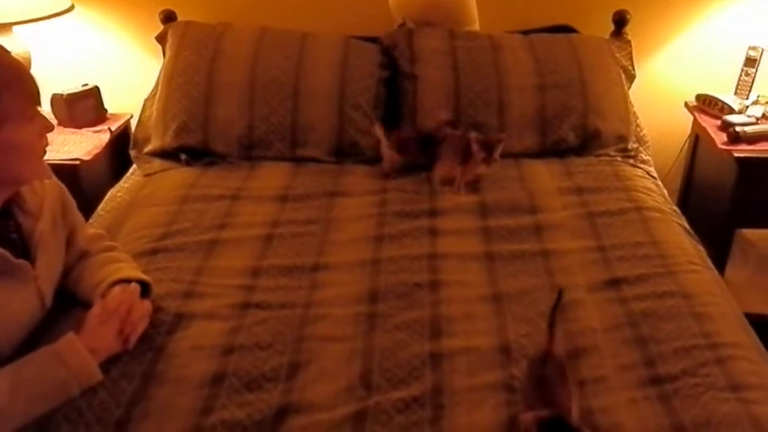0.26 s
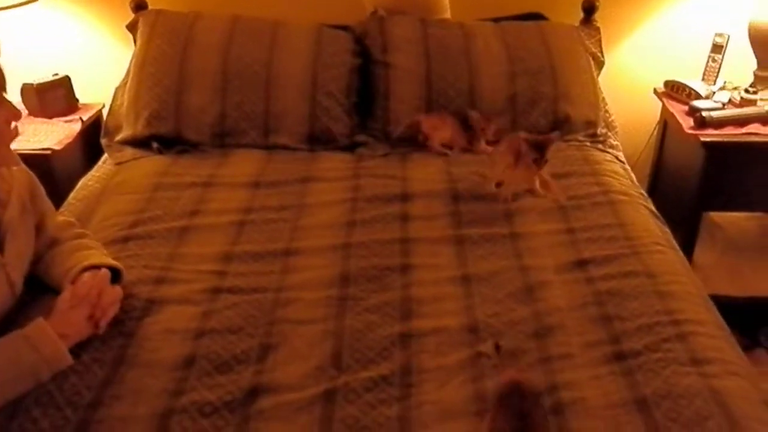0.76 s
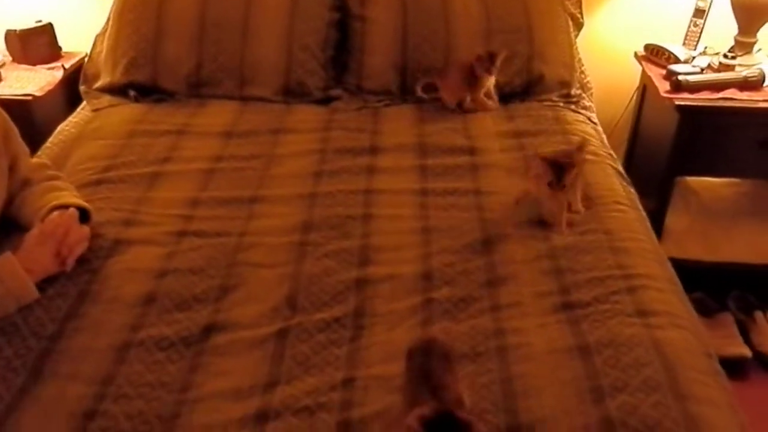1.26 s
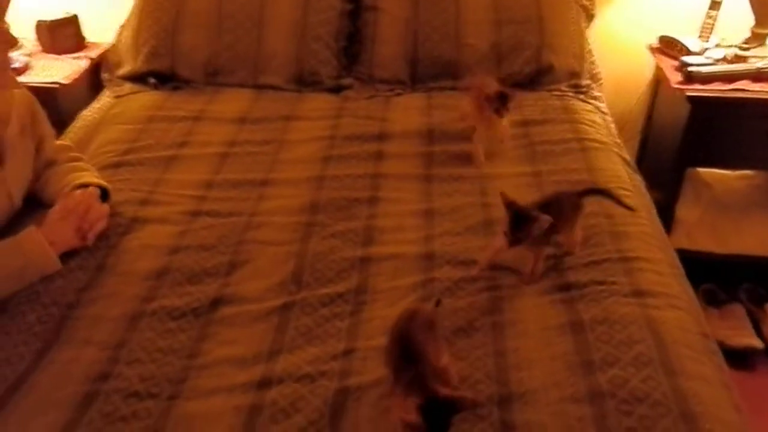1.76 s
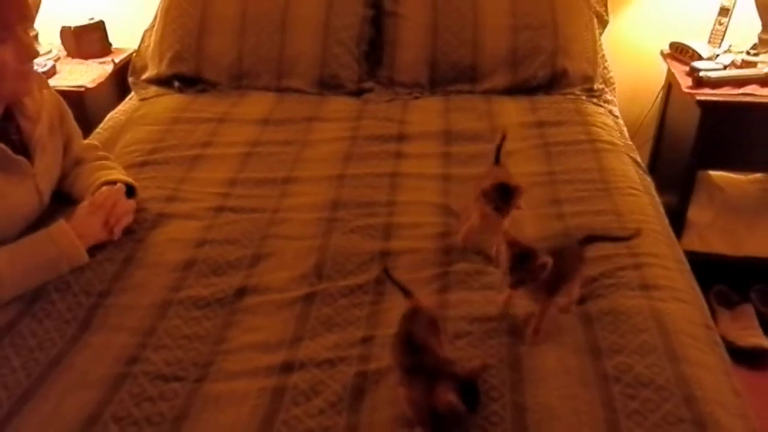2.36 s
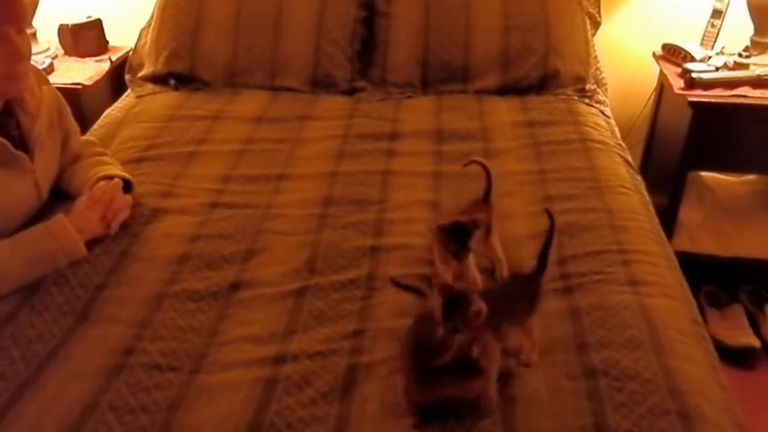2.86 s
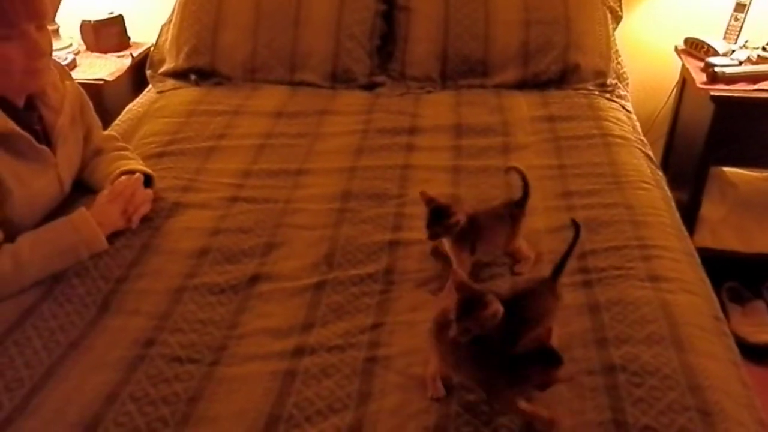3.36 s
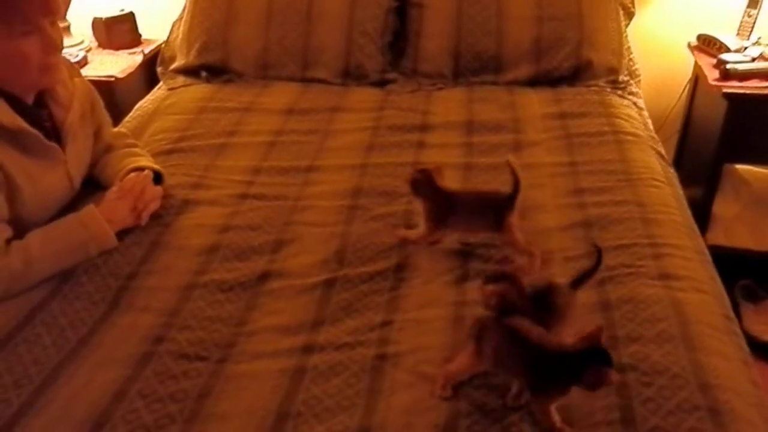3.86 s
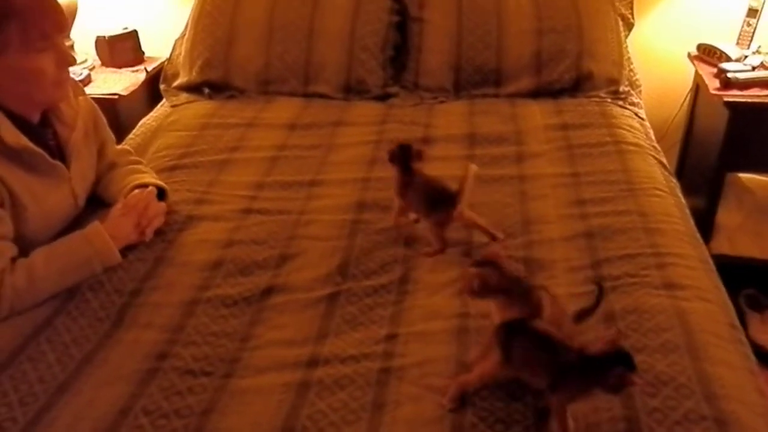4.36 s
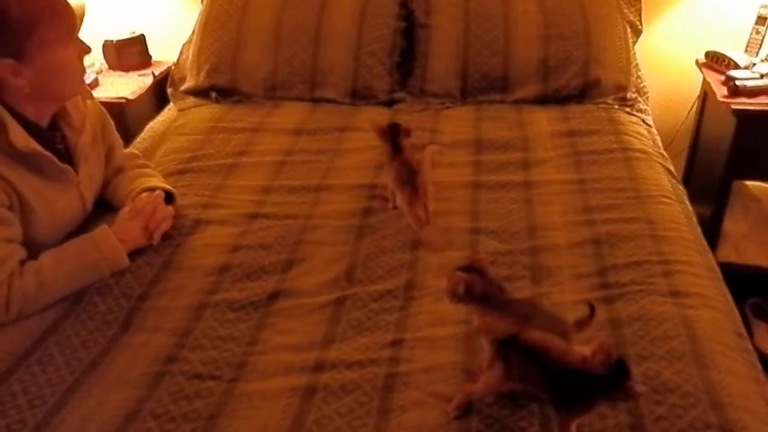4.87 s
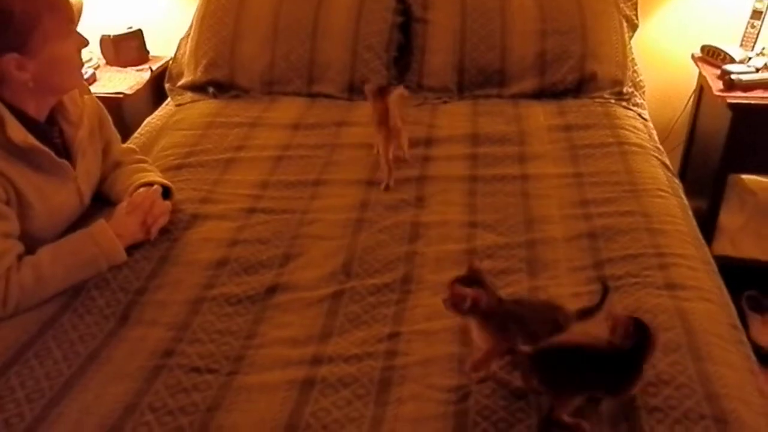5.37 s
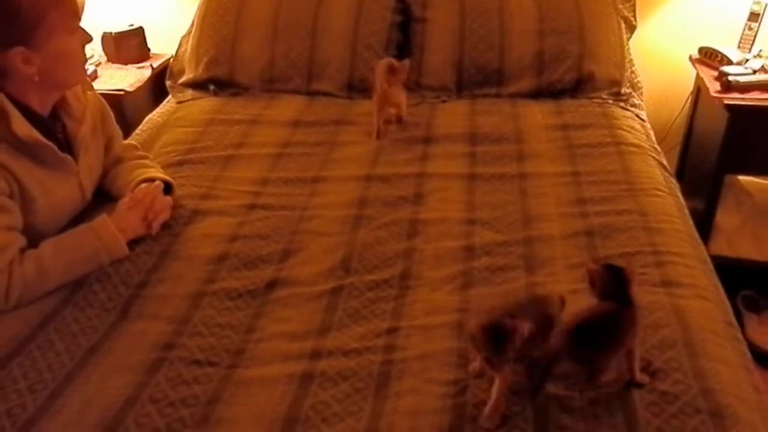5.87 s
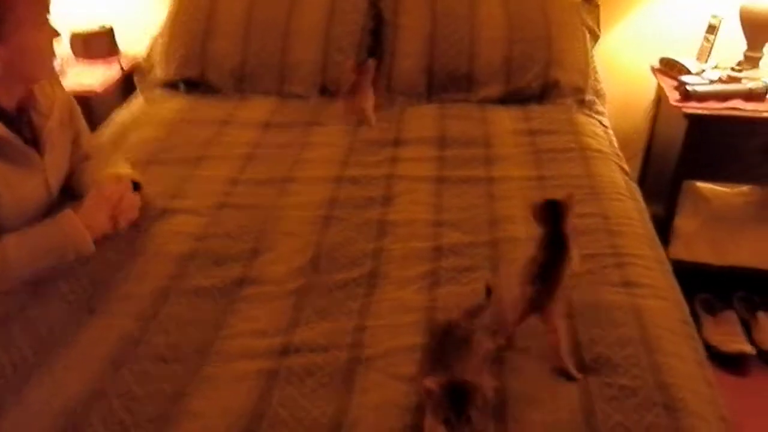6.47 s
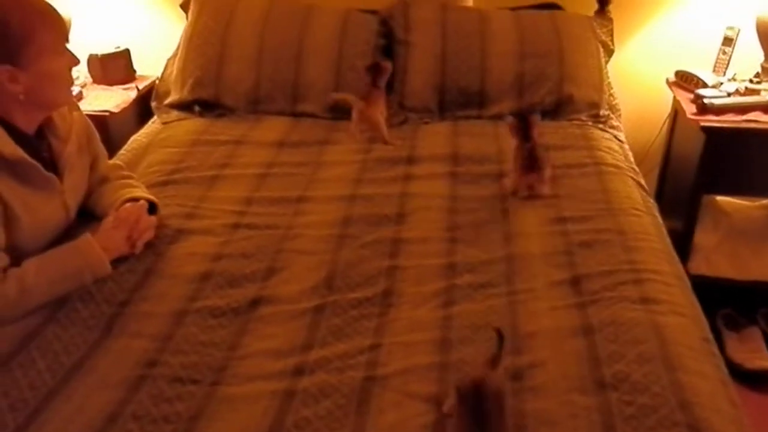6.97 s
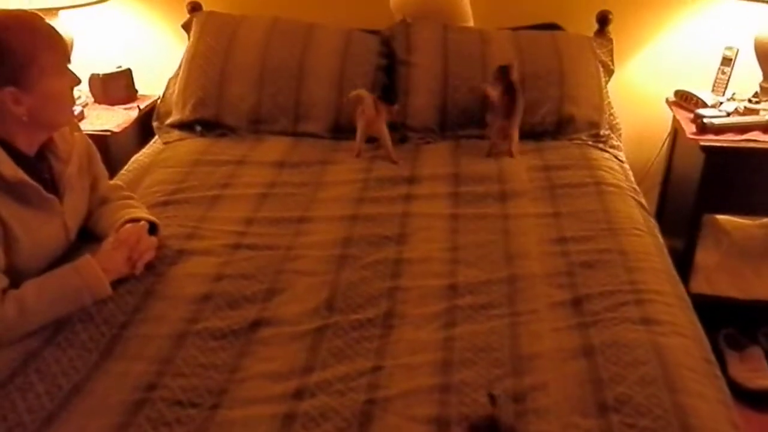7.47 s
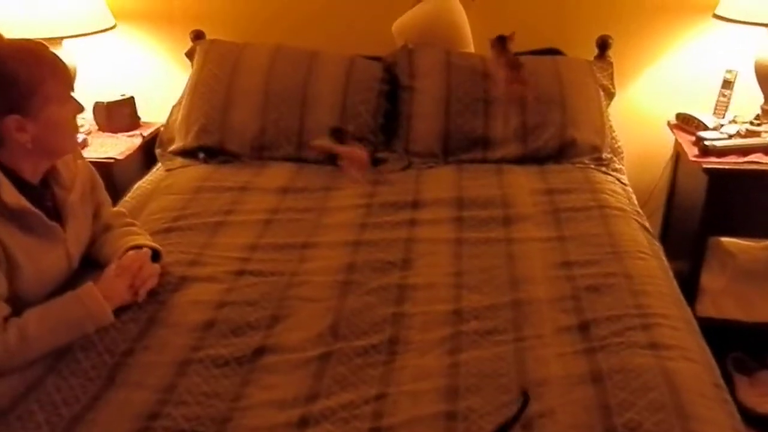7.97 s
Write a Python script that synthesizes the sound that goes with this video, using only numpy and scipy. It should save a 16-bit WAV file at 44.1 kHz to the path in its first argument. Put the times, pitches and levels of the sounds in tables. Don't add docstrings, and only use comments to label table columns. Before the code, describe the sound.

Small claws scrape woven bedding in irregular bursts, snapping threads and thumping the mattress softly, while a fan and low mains hum continue.

```python
import sys
import numpy as np
from scipy import signal
from scipy.fft import rfft, irfft, next_fast_len
from scipy.io import wavfile
from scipy.ndimage import uniform_filter1d, map_coordinates

SR = 44100
rng = np.random.default_rng(int(sys.argv[2]) if len(sys.argv) > 2 else 0)


def nominal_scale(level):
    x = np.asarray(level, float) / 20
    return 10 ** x


def dump(signal):
    limited = np.clip(np.atleast_2d(signal).T, -1, 1)
    pcm = np.round(limited * 32767).astype(np.int16)
    wavfile.write(sys.argv[1], SR, pcm)


N = 362502


def unit(x):
    return x / np.sqrt(np.mean(x ** 2) + 1e-20)


def along(points, hz):
    f, v = np.transpose(points)
    return np.interp(np.log(hz + 1), np.log(f + 1), v)


def wobble(rate_hz):
    knots = rng.standard_normal(int(N * rate_hz / SR) + 4)
    return map_coordinates(knots, [np.arange(N) * rate_hz / SR])


def filtered(x, response):
    m = next_fast_len(len(x) + 8192)
    return irfft(rfft(x, m) * response(np.fft.rfftfreq(m, 1 / SR)), m)[:len(x)]


def resonance(f, hz, width_hz):
    return 1j * f * width_hz / (hz * hz - f * f + 1j * f * width_hz)


def ringing(x, modes):
    def response(f):
        return sum((-1) ** k * nominal_scale(db) * resonance(f, hz, width_hz)
                   for k, (hz, width_hz, db) in enumerate(modes))
    return filtered(x, response)


def cupped(x, modes):
    def response(f):
        return sum(nominal_scale(db) * hz * width_hz / (hz * hz - f * f + 1j * f * width_hz)
                   for hz, width_hz, db in modes)
    return filtered(x, response)


def tinted(spectrum):
    return lambda x: filtered(x, lambda hz: nominal_scale(along(spectrum, hz)))


def coloured(spectrum):
    return unit(tinted(spectrum)(rng.standard_normal(N)))


def fibres(response, grain_db):
    slips = rng.standard_normal(N) * nominal_scale(grain_db * wobble(300))
    return unit(response(slips))


def claws():
    # (frequency [Hz], level [dB per Hz])
    weave_spectrum = [(700, -20.5), (1050, -9), (1400, -4), (1800, 1.5), (2250, -6.5), (2550, -18),
                      (3000, -13.5), (3600, -21.5), (4400, -34), (6000, -73)]
    # (frequency [Hz], level [dB per Hz])
    nap_spectrum = [(3300, -40), (3900, -10.5), (4500, -14), (5600, -3), (7000, -0.5), (8700, -2.5),
                    (9800, -11.5), (11000, -12), (14000, -11), (16000, -31.5)]
    # (frequency [Hz], level [dB per Hz])
    tear_spectrum = [(2100, -27.5), (2750, 9), (3400, -4), (3900, 3.5), (4800, -2.5), (6500, -11),
                     (10000, -11), (14000, -9.5)]
    # (frequency [Hz], width [Hz], level over the direct path [dB])
    shell_modes = [(2645, 760, -0.5), (4170, 320, -1.5), (4740, 350, 1), (5740, 1200, -2.5),
                   (7030, 300, 2.5), (8310, 960, -1.5)]
    # (frequency [Hz], width [Hz], level [dB])
    cloth_modes = [(370, 190, -1.5), (595.4, 109, -1), (802, 280, -6.5)]

    scrape, nap, body = np.sqrt(strokes())
    stitching = nominal_scale(2.58 * wobble(40))
    treble = scrape * fibres(tinted(weave_spectrum), grain_db=2.5)
    treble += nap * fibres(tinted(nap_spectrum), grain_db=2.0)
    treble += nominal_scale(30.5) * scrape ** 1.812 * fibres(tinted(tear_spectrum), grain_db=3)

    bounce_s = 0.00107
    treble = filtered(treble, lambda f: 1 + 0.092 * np.exp(-2j * np.pi * f * bounce_s))

    def shell(f):
        return 1 + sum(nominal_scale(db) * resonance(f, hz, width_hz) for hz, width_hz, db in shell_modes)

    treble = nominal_scale(-3) * filtered(treble, shell)
    cover = fibres(lambda x: ringing(ringing(x, cloth_modes), cloth_modes), grain_db=3.5)
    return stitching * treble + body * nominal_scale(2.2 * wobble(25)) * cover


def strokes():
    # (time [s], length [s], scrape [dB], weight on the cover [dB])
    swipes = [(0.418, 0.15, -70, 7), (0.769, 0.1, -60, 7), (0.972, 0.045, -72.5, 12.5),
              (1.209, 0.058, -89, 20.5), (1.478, 0.063, -65, 6), (1.644, 0.074, -83, 20),
              (1.71, 0.12, -77, 4), (3.107, 0.17, -75.5, 5), (4.396, 0.14, -68.5, 0),
              (5.953, 0.048, -47, -4), (6.004, 0.11, -76, 4), (6.05, 0.16, -69, -3), (6.23, 0.15, -63, -1),
              (6.496, 0.033, -48.5, -0.5), (6.519, 0.14, -58, 1), (6.782, 0.068, -57.5, 3),
              (6.969, 0.03, -59.5, 9), (6.916, 0.082, -52.5, -3.5), (6.987, 0.15, -62.5, 3.5),
              (7.398, 0.04, -68, 14), (7.45, 0.1, -73, 19), (7.854, 0.17, -82, 25.5)]
    # (time [s], length [s], scrape [dB], weight on the cover [dB])
    drags = [(0.662, 0.049, -72.5, 1), (1.289, 0.087, -62, 2.5), (1.827, 0.2, -62.5, -2),
             (1.963, 0.16, -64.5, -3), (2.037, 0.18, -61, 0), (2.225, 0.11, -59.5, -12),
             (2.331, 0.14, -58, 3.5), (2.668, 0.15, -68.5, 6.5), (2.848, 0.08, -67.5, 8),
             (2.901, 0.087, -68, -5), (3.612, 0.13, -73.5, 13), (3.985, 0.089, -78, 7.5),
             (4.123, 0.23, -63, -3), (4.299, 0.13, -68.5, 5.5), (4.663, 0.069, -71, 1),
             (5.016, 0.098, -86.5, 6), (5.36, 0.17, -80, 0), (6.465, 0.068, -56, 4),
             (6.839, 0.095, -57, 8.5), (7.317, 0.1, -75.5, 10), (7.58, 0.3, -82, 18), (7.69, 0.16, -79, 20),
             (7.99, 0.074, -69, 6), (6.621, 0.044, -49.5, 3), (6.74, 0.17, -62, 0),
             (6.69, 0.071, -48.5, -1)]
    # (time [s], length [s], scrape [dB], weight on the cover [dB])
    pulls = [
        (0.07, 0.36, -76, 5.5),
        (2.495, 0.19, -64.5, 5.5),
        (3.273, 0.083, -76.5, -1),
        (3.707, 0.073, -75, -6.5),
        (3.786, 0.23, -67.5, -12.5),
        (4.803, 0.11, -66.5, -4),
        (5.87, 0.146, -64, -19),
        (6.359, 0.12, -67.5, -18),
        (6.647, 0.053, -63, 10),
    ]
    # (time [s], length [s], scrape [dB], weight on the cover [dB])
    scuffs = [
        (3.044, 0.076, -83, 20),
        (5.216, 0.029, -59, 9.5),
        (5.305, 0.04, -71, 8.5),
        (7.104, 0.2, -62, 2),
        (8.06, 0.11, -81.5, 19.5),
    ]

    rows = [(row, 0.011, 0) for row in swipes]  # (stroke, rise [s], nap level [dB])
    for table, share, nap_db in (drags, 0.31, 0), (pulls, 0.62, 0), (scuffs, 0.15, -20):
        rows += [(row, share * row[1], nap_db) for row in table]

    t = np.arange(N) / SR
    power = np.zeros((3, N))
    for (s, length_s, db, weight_db), rise_s, nap_db in rows:
        end_s = s + length_s
        span = slice(round(s * SR), round(end_s * SR))
        pressure = np.minimum((t[span] - s) / rise_s, (end_s - t[span]) / (length_s - rise_s))
        grip = 1.5 + max(0, 0.17 * (db + 56.5))
        swell = np.clip(grip * pressure, 0, 1) ** 2.2
        nap_db = nap_db - 11.5 - 0.04 * (db + 61.5)
        power[:, span] += swell * nominal_scale(db + np.array([[0], [nap_db], [weight_db]])) ** 2
    return power


def snaps():
    # (time [s], peak [dB], thud [dB], brightness [dB], rattle [0-1])
    thread_snaps = [(0.4223, -40, -1, -11.5, 1), (0.7703, -25, -2.5, -7, 0.16),
                    (0.9700, -28.5, -29.5, -3, 0.6), (0.9789, -34, 4, -20.5, 0.44),
                    (1.2867, -25.5, -5.5, -5.5, 0.29), (1.48, -26, -2, -20.5, 0.44),
                    (2.348, -49, 4, -15, 0.05), (2.5176, -40.5, -2.5, -15, 1),
                    (6.0934, -36.5, -6.5, -3.5, 0.44), (7.106, -46, -6, -8, 0.1),
                    (7.4028, -33.5, -39, 0.5, 0.78), (7.46, -27.5, -16.5, -40, 0),
                    (7.471, -37.5, -24, 2.5, 0.32), (7.6119, -28.5, -10.5, -13.5, 0.18),
                    (7.86, -34.5, -19, -12, 0.26)]
    # (time [s], peak [dB])
    claw_ticks = [(3.0512, -59), (3.064, -54.5), (3.074, -59), (3.6423, -54), (4.58, -47.5), (5.224, -50.5),
                  (7.2733, -37), (7.3387, -40), (7.906, -59), (7.9393, -44), (8.128, -58), (7.183, -60),
                  (8.1887, -37)]
    # (frequency [Hz], width [Hz], level [dB])
    cavity_modes = [(1912, 405, 0.5), (2640, 630, -12.5)]
    # (frequency [Hz], width [Hz], level [dB])
    muffled_modes = [(1700, 670, -6), (2850, 210, -13)]
    # (frequency [Hz], width [Hz], level [dB])
    port_modes = [(6740, 1850, 2.5), (9300, 1800, -2.5), (14800, 3100, -7), (4540, 1400, -5.5)]
    # (frequency [Hz], width [Hz], level [dB])
    mattress_modes = [(185, 170, 0), (380, 70, -3), (850, 110, -6), (640, 55, 0)]

    edge, push = np.zeros((2, N + SR))
    pulse = np.zeros((2, N + SR))
    t = np.arange(512) / SR
    ticks = [(s, db, -14, -40, 0.18) for s, db in claw_ticks]
    for s, db, thud_db, bright_db, rattle in thread_snaps + ticks:
        slips = rattle * rng.standard_normal(len(t)) * nominal_scale(-60 * t / 0.015)
        slips *= rng.random(len(t)) < 0.15
        heavy = np.clip((thud_db + 12) / 12, 0, 1)
        slips *= 1 - 0.7 * heavy
        slips[0] = 1
        at = round((s + 0.0005) * SR)
        pulse[:, at:at + len(t)] += nominal_scale(db + 32) * slips * np.array([[1 - heavy], [heavy]])
        edge[at:at + len(t)] += nominal_scale(db + bright_db + 13) * slips
        push[at + 4] += nominal_scale(db + thud_db + 39)

    boom = cupped(pulse[0], cavity_modes) + cupped(pulse[1], muffled_modes)
    boom = filtered(boom, lambda f: 1 / (1 + 1j * f / 4500) ** 4)
    click = ringing(ringing(edge, port_modes), [(12000, 30000, 0.032)])
    padded = filtered(push, lambda f: 1 / (1 + 1j * f / 1500) ** 2)
    return (boom - click + ringing(padded, mattress_modes))[:N]


def paws():
    # (time [s], peak [dB], ring [Hz], t60 [s])
    landings = [
        (0.427, -36.5, 91, 0.041),
        (0.444, -43, 165, 0.082),
        (0.498, -38.5, 133, 0.04),
        (2.35, -47.5, 317, 0.071),
        (4.583, -42.5, 118, 0.089),
        (6.108, -37, 302, 0.028),
        (6.787, -36, 135, 0.024),
        (7.901, -42, 153, 0.074),
    ]
    # (time [s], peak [dB], ring [Hz], t60 [s])
    slipping_pads = [(0.119, -38, 480, 0.017), (5.219, -47, 534, 0.033), (6.094, -31.5, 510, 0.023),
                     (6.474, -39.5, 537, 0.019), (6.846, -48, 608, 0.05), (6.856, -47, 624, 0.12),
                     (6.872, -39, 557, 0.042), (6.881, -45, 648, 0.1), (6.955, -43.5, 617, 0.042),
                     (6.981, -48.5, 613, 0.041), (7.722, -43.5, 460, 0.029)]

    out = np.zeros(N + SR)
    t = np.arange(SR // 12) / SR
    onset = 1 - np.exp(-t / 0.00077)
    for s, db, hz, t60_s in landings + slipping_pads:
        at = round(s * SR)
        ring = np.sin(2 * np.pi * hz * t * (1.06 - 6 * t))
        out[at:at + len(t)] += nominal_scale(db + 5 - 60 * t / t60_s) * ring * onset
    return out[:N]


def bedroom(x):
    # (frequency [Hz], t60 [s])
    decay = [(200, 0.18), (2000, 0.016), (10000, 0.011)]
    hz, t, z = signal.stft(rng.standard_normal(SR // 3), SR, nperseg=256)
    fading = z * nominal_scale(-60 * t / along(decay, hz)[:, None])
    tail = signal.istft(fading, SR, nperseg=256)[1]
    tail /= np.linalg.norm(tail)
    return signal.fftconvolve(np.pad(x, (220, 0)), tail)[:N]


def springs():
    # (frequency [Hz], width [Hz], level [dB])
    spring_modes = [(175, 172, -0.5), (372, 150, -5)]
    settle_s = 0.088
    load = np.abs(uniform_filter1d(strokes()[2], round(settle_s * SR)))
    strength = np.sqrt(nominal_scale(-72) ** 2 + nominal_scale(-6) ** 2 * load)
    return strength * nominal_scale(5.1 * wobble(12)) * unit(ringing(rng.standard_normal(N), spring_modes))


def rocking():
    # (time [s], rumble [dB], half length [s])
    jolts = [(0.213, -49, 0.13), (0.447, -49, 0.18), (0.62, -50.5, 0.099), (0.803, -45, .15),
             (0.998, -43.5, 0.075), (1.294, -43.5, 0.042), (1.485, -47, 0.12), (1.853, -59, .12),
             (2.007, -56, 0.28), (2.42, -52, 0.06), (2.622, -57, 0.19), (3.472, -65.5, 0.29),
             (3.916, -55, .15), (4.855, -57.5, .2), (6.002, -57.5, .2), (6.675, -48.5, 0.37),
             (7.358, -52.5, 0.17), (7.503, -54, 0.18), (8.147, -58.5, 0.75)]
    # (frequency [Hz], level [dB per Hz])
    sway_spectrum = [(12, -25.5), (20, -1), (75, -1.5), (100, 0.5), (130, -12.5), (220, -120)]
    t = np.arange(N) / SR
    power = nominal_scale(-62) ** 2
    for s, db, half_s in jolts:
        power = power + nominal_scale(db - 13 * np.abs(t - s) / half_s) ** 2
    return np.sqrt(power) * nominal_scale(0.26 * wobble(4)) * coloured(sway_spectrum)


def hum():
    # (frequency [Hz], wander [per s], level [dB])
    tones = [(103.2, 5, -61), (121.1, 4, -54)]
    t = np.arange(N) / SR
    out = np.zeros(N)
    for hz, rate_hz, db in tones:
        level = nominal_scale(db - 1 + 0.63 * wobble(rate_hz))
        out += level * np.sin(2 * np.pi * hz * t + 0.51 * wobble(rate_hz))
    return out


def room_air():
    # (frequency [Hz], level [dB per Hz])
    air_spectrum = [(35, -32), (60, -12), (119, -5), (170, -10.5), (290, -11.5), (500, -19.5), (760, -27.5),
                    (1240, -42), (2000, -50.5), (3000, -57), (7000, -49), (12500, -52), (14200, -43.5),
                    (15800, -41)]
    return nominal_scale(-56) * coloured(air_spectrum)


def scene():
    hits = snaps() + paws()
    echo = nominal_scale(-21) * bedroom(hits)
    return (claws() + hits + echo + springs() + rocking() + hum() + room_air())[None]


def low_pass(x):
    return signal.sosfilt(signal.butter(12, 16970, fs=SR, output="sos"), x)


def record(dry):
    # (frequency [Hz], level [dB])
    gate = [(1500, -125), (2600, -106.5), (5000, -105), (8000, -106), (11000, -106), (14000, -107),
            (15850, -107.5), (15900, -80)]
    hz, _, z = signal.stft(dry[0], SR, nperseg=2048)
    floor = nominal_scale(along(gate, hz))[:, None]
    band = np.arange(len(hz)) // 16
    power = np.add.reduceat(np.abs(z) ** 2, np.arange(0, len(hz), 16)) / 16
    level = np.sqrt(power)[band]
    jitter = nominal_scale(2 * rng.standard_normal((band[-1] + 1, z.shape[1])))[band]
    kept = z * (level > floor * jitter) * (np.abs(z) > nominal_scale(1) * floor)
    mix = signal.istft(kept, SR, nperseg=2048)[1][None, :N]
    return low_pass(mix)


dry = scene()
out = record(dry)
dump(out)
```